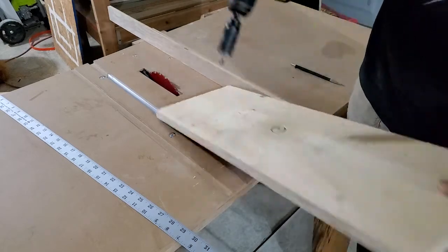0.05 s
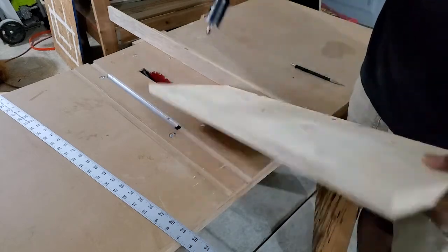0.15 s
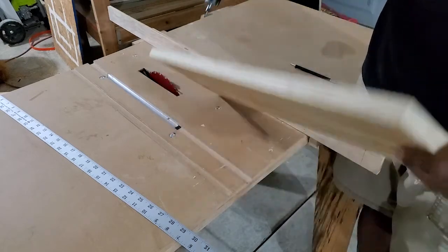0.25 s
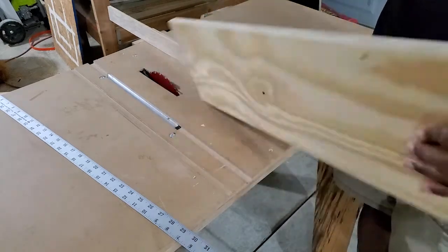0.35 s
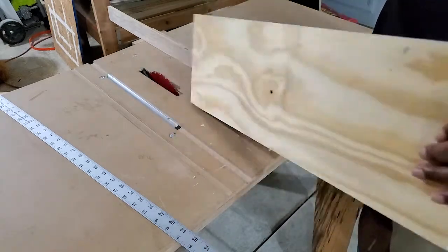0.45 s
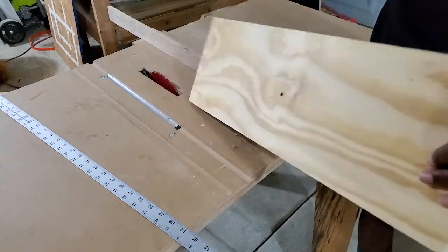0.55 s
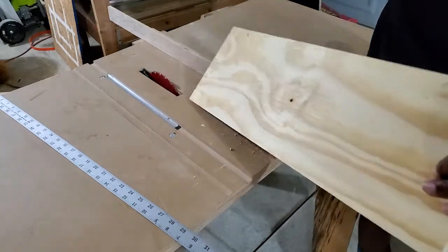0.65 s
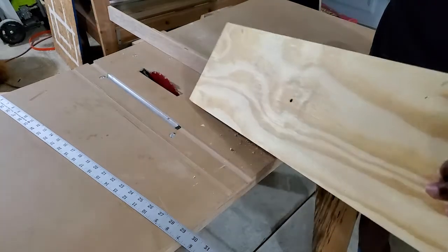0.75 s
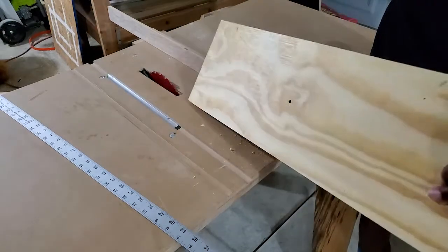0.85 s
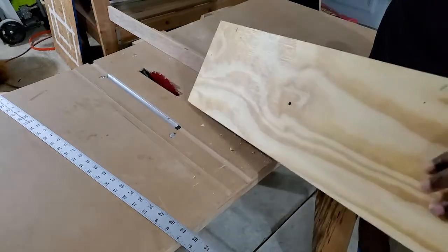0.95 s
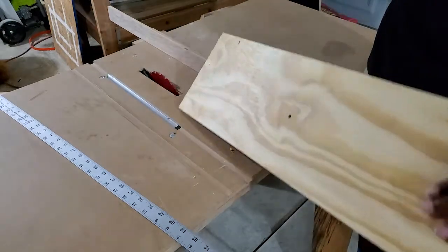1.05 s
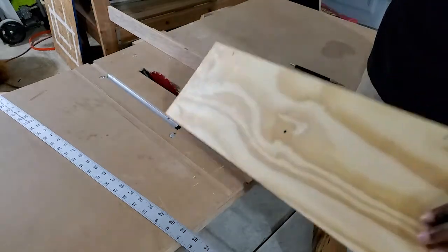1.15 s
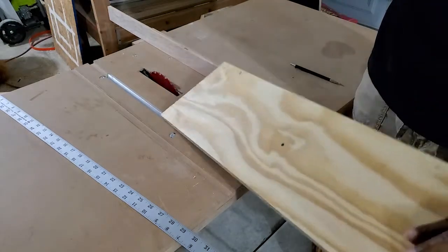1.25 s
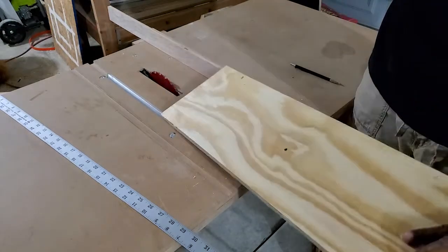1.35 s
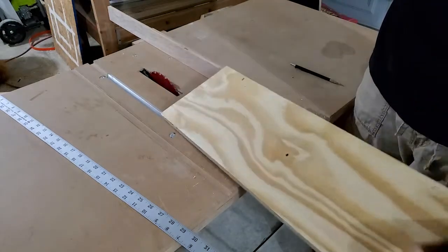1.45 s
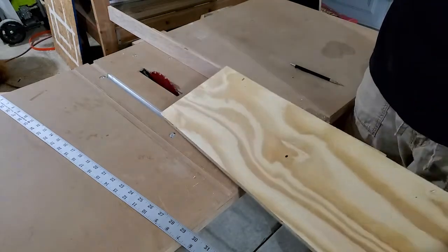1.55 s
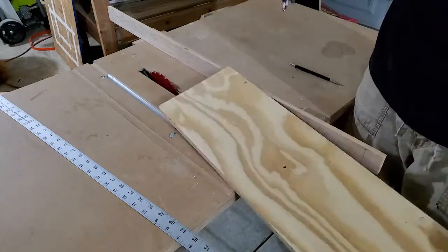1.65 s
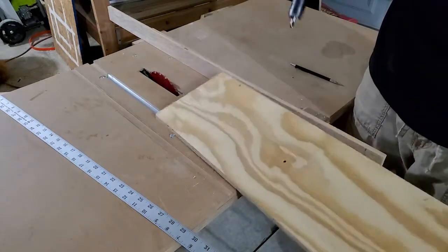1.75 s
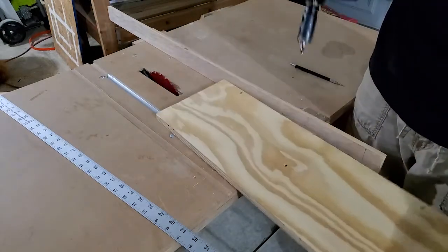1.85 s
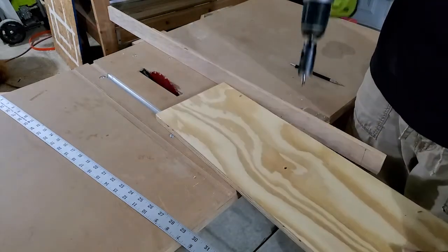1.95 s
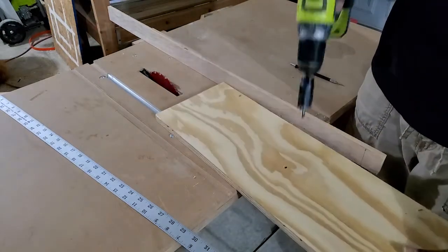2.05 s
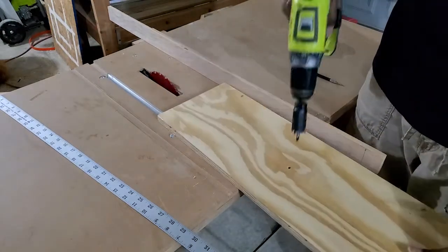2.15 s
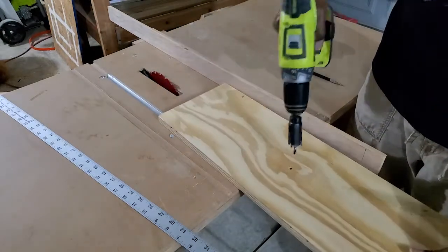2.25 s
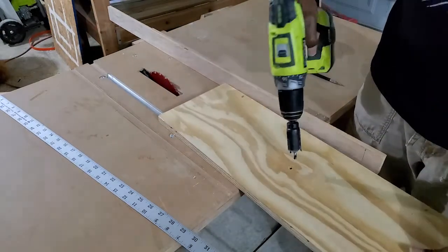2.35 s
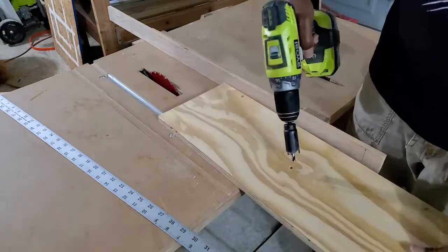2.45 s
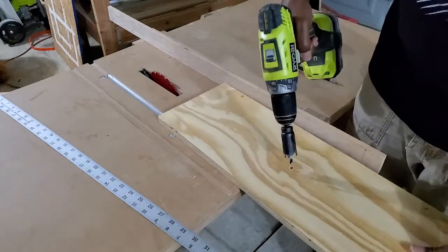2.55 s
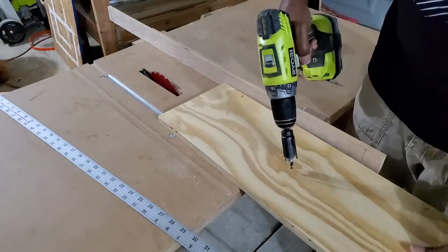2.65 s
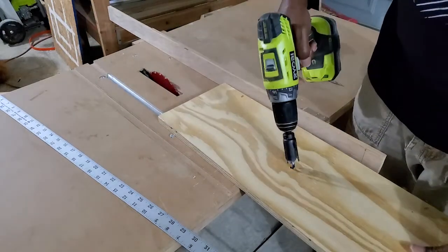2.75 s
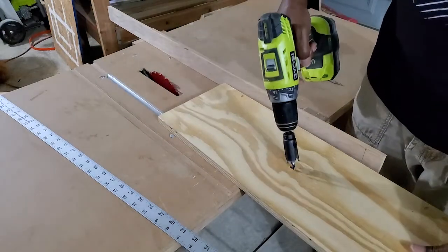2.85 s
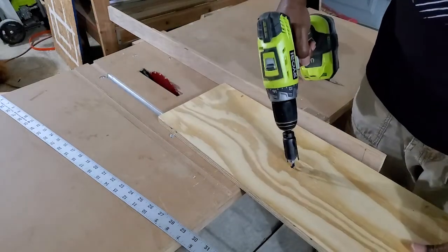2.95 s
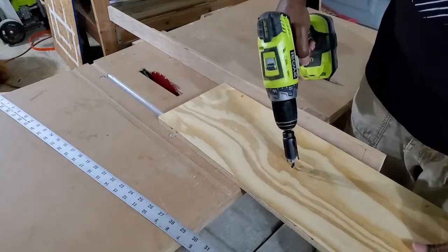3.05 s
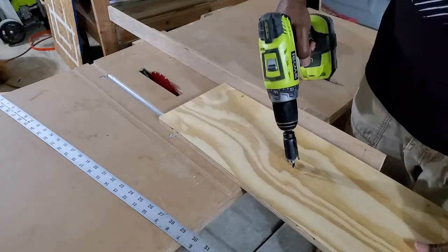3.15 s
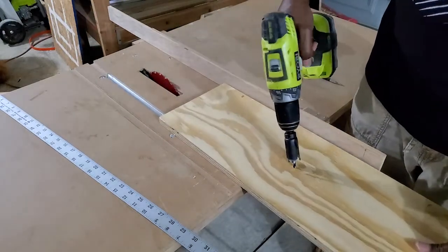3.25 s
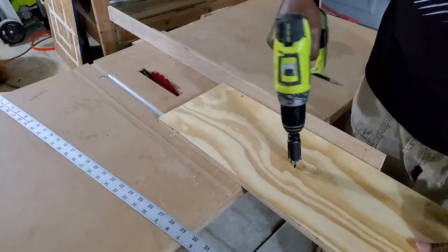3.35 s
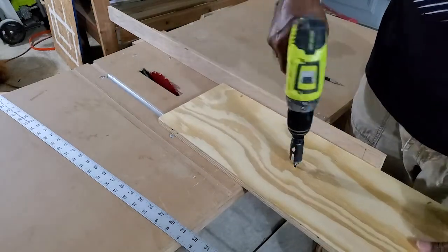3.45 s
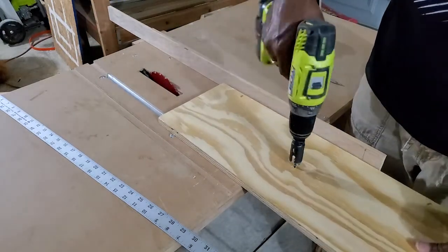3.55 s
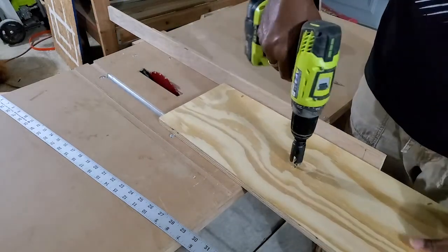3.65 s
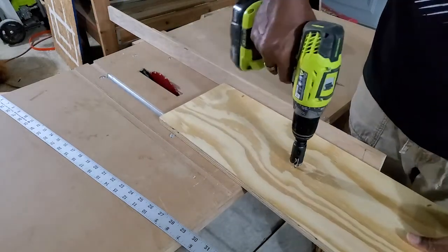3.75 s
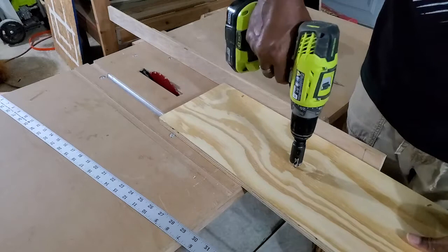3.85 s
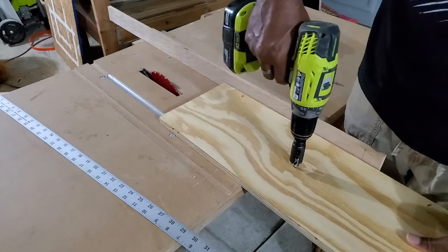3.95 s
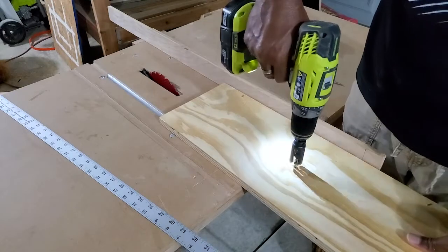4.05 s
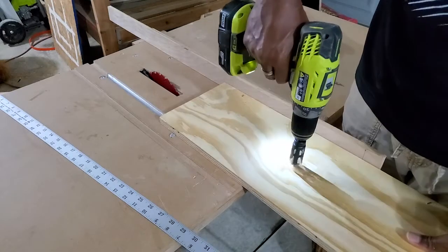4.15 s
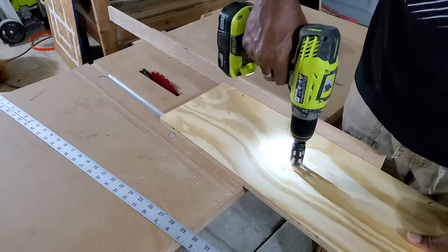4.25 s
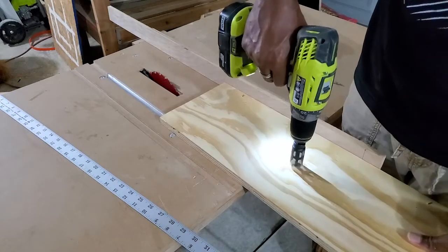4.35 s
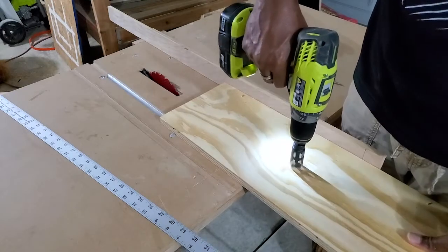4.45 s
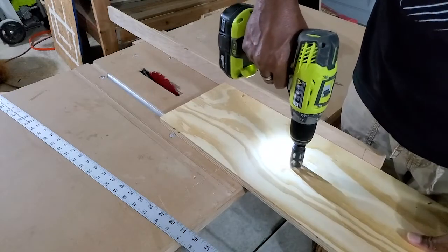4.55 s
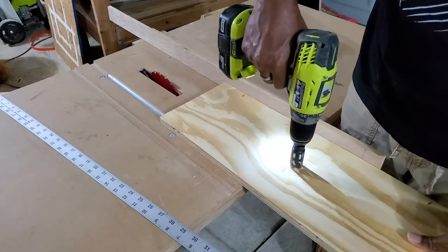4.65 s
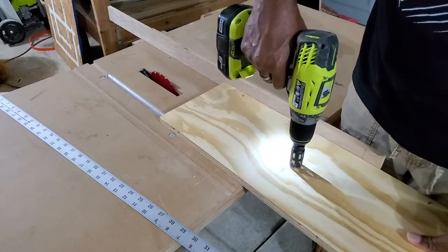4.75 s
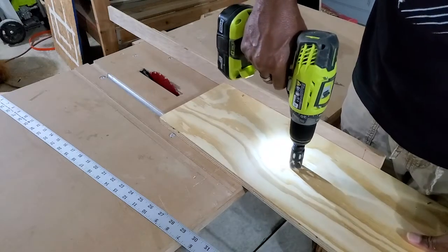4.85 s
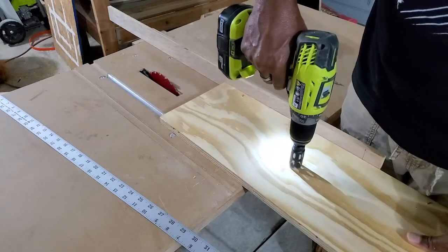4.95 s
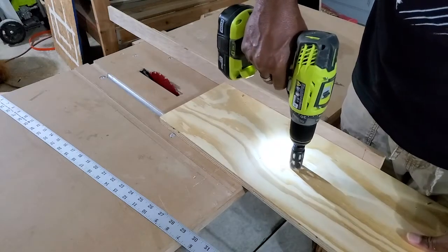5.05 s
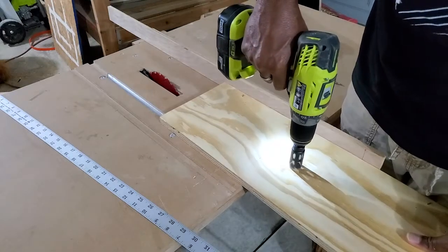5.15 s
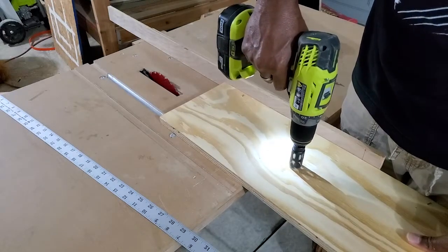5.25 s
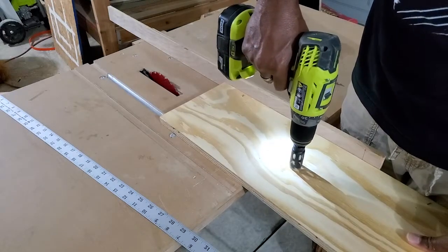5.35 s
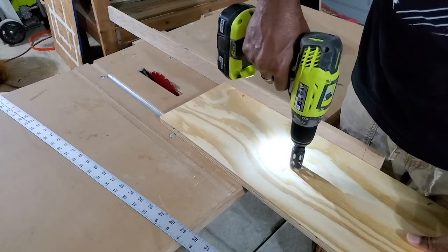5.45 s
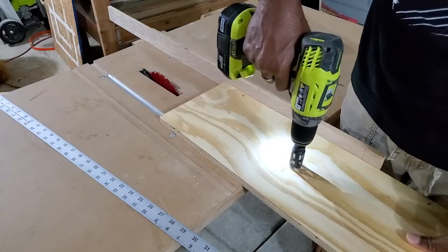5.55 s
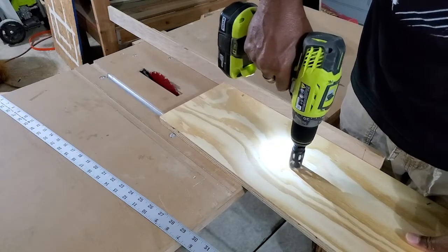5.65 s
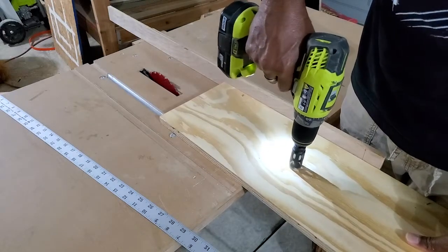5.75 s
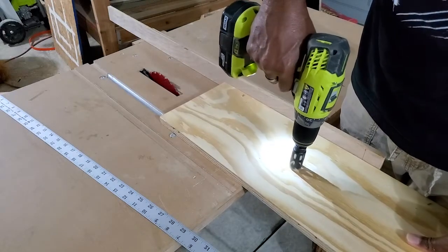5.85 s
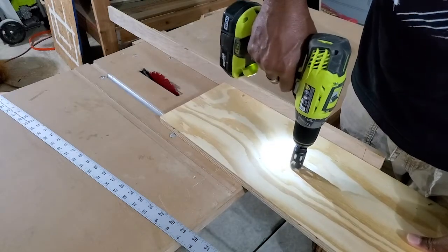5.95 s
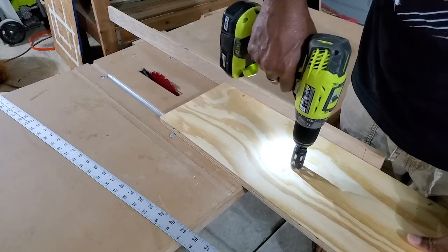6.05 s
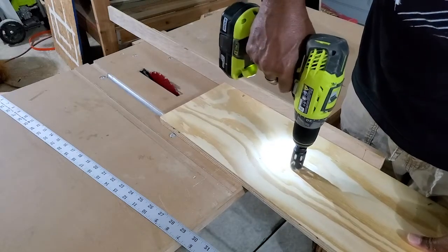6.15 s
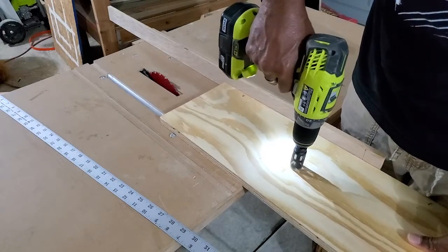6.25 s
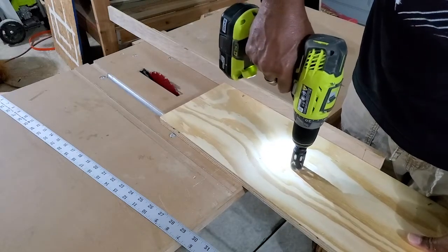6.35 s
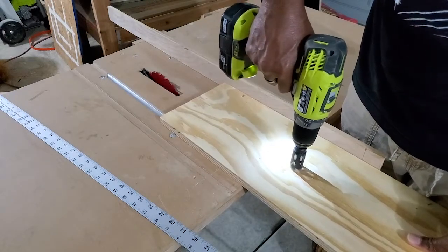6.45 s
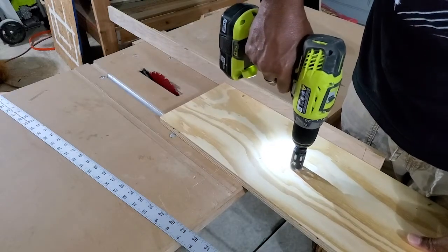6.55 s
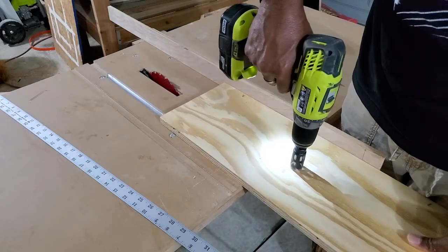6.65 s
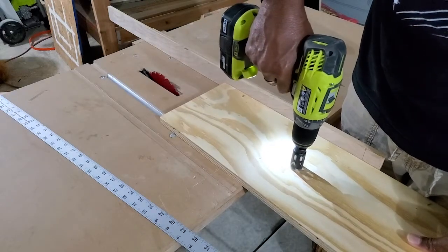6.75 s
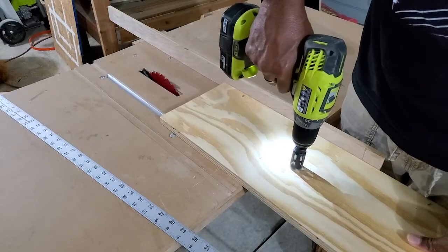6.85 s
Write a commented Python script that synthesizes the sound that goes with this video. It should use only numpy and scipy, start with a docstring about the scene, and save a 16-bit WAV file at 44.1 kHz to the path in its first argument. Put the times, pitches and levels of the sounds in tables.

```python
"""A board slides and knocks on a saw bench in a garage; then a drill whines and hisses as its hole saw rasps.
Slides are fine crackle through wood resonances; knocks are ringing board modes, bench thumps and bursts of impacts.
Hand rubs and clicks ring the drill's shell, and a soft bump sets the drill on the pine board.
Motor tones follow a speed curve. Noise surges make the rasp, tooth pulses shake board and bench,
and in short runs a tooth catches once a turn. Faint room air and hum lie under it all."""
import sys
import numpy as np
from scipy import signal
from scipy.fft import rfft, irfft, next_fast_len
from scipy.io import wavfile
from scipy.ndimage import map_coordinates

SR = 44100
rng = np.random.default_rng(int(sys.argv[2]) if len(sys.argv) > 2 else 0)


def transcribe(signal):
    """Save signal, clipped to [-1, 1], as a 16-bit WAV file at the path in sys.argv[1]."""
    frames = np.atleast_2d(signal).T
    limited = np.clip(frames, -1, 1)
    pcm = np.round(limited * 32767).astype(np.int16)
    wavfile.write(sys.argv[1], SR, pcm)


N = 304731

# Levels in the tables and settings are relative: the functions and scene() balance them further.
# Motor speed: the trigger is squeezed, eased, squeezed again, then the load drags on it.
# Each row: time in seconds, speed in turns per second.
MOTOR_SPEED = [(4.0, 35), (4.25, 258), (4.3, 313), (4.375, 334), (4.5, 283), (4.58, 256), (4.66, 243),
               (4.7, 298), (4.77, 326), (4.94, 342.5), (5.42, 326), (5.8, 327), (5.9, 333), (6.1, 334.5),
               (6.5, 330), (6.91, 320)]
# Bouts in which the saw rocks in its groove.
# Each row: start in seconds, length in seconds, level in dB, tilt of its upper multiples in dB per octave.
CHATTER = [(5.126, 0.082, -46, -12), (6.206, 0.2, -57, 5), (6.495, 0.13, -40.5, -2.5)]
# The rocking's tones. Each row: multiple of the saw's turn rate, level in dB.
LOBES = [(3, -2.5), (6, 4), (10, -5), (16, -2), (18, -3.5), (26, -8)]
# Motor tones. Each row: multiple of the motor's turn rate, level in dB.
WHINE = [(5, -15.5), (12, -7.5), (19, -24), (20, -11.5), (29, -9.5), (30, -13), (32, -25), (35, -26),
         (45, -20)]
# Squeals as the pilot bit enters.
# Each row: start in seconds, length in seconds, first pitch in Hz, last pitch in Hz, level in dB.
SQUEALS = [(4.091, 0.16, 1900, 2376, -46), (4.13, .115, 3900, 4440, -39.5)]
# Resonances of the board pressed on the bench. Each row: pitch in Hz, width in Hz, level in dB.
PRESSED_BOARD = [(371.5, 74, 0), (424, 31, -3.5), (584.7, 16, 2.5), (772, 49, -8), (1014.6, 7.4, 4),
                 (1260, 9, 1)]
# Resonances of the bench. Each row: pitch in Hz, width in Hz, level in dB.
BENCH = [(56, 38, 1), (106, 39, 1), (157, 55, 2), (203.3, 25, 1), (317.3, 100, 0.5)]
# Resonances of saw cup and chuck. Each row: pitch in Hz, width in Hz, level in dB.
CUP = [(1388, 63, -1), (1878, 152, 2.5), (2070, 76, 0.5), (2680, 450, -3), (4076, 230, 1.5),
       (5640, 91, -13)]
# Colour of flying chips, and of skin rubbing. Each row: frequency in Hz, level in dB per Hz.
CHIPS = [(200, 0.5), (600, -33), (950, 1.5), (1600, 2.5), (2300, 5.5), (3500, 1.5), (7000, -20),
         (8500, -7.5), (12000, -7)]
# Colour of the fan hiss, which also shades the whine. Each row: frequency in Hz, level in dB per Hz.
FAN = [(200, -0.5), (900, -5.5), (1800, 8.5), (3400, 2.5), (6500, 4), (7400, 3.5), (8300, -3.5), (9300, 2),
       (11500, 5), (14200, 2.5), (16000, 2.5)]
# Colour of the sliding crackle. Each row: frequency in Hz, level in dB per Hz.
SLIDE_COLOUR = [(500, -21.5), (1000, -9.5), (1260, -3.5), (2900, -10.5), (8500, -26.5), (12000, -25),
                (16000, -32.5)]
# Colour of the room's still air. Each row: frequency in Hz, level in dB per Hz.
AIR = [(25, -34.5), (55, -4.5), (90, -17), (125, -11.5), (185, -8), (260, -14.5), (600, -22), (3500, -53),
       (16000, -59)]
# Machine hum. Each row: pitch in Hz, level in dB.
HUM = [(120, -72), (178, -70)]
# Strokes that push the board over the bench.
# Each row: start in seconds, length in seconds, board level in dB, scrape level in dB,
# brightness in dB per octave.
SLIDES = [(0.0, 0.2, -61.5, -66, -3), (0.192, 0.071, -48, -58.5, -1), (0.273, 0.03, -49, -55.5, -7.5),
          (0.294, 0.026, -61, -41, 0), (0.376, 0.012, -69, -45, 3), (0.82, 0.036, -65, -64.5, 2.5),
          (0.954, 0.12, -66, -54, 7.5), (0.988, 0.041, -53, -51.5, -16), (1.095, 0.12, -56, -54, 3.5),
          (1.238, 0.17, -48, -66.5, -5.5), (1.602, 0.28, -42.5, -52, -4)]
# The board meets bench and fence.
# Each row: time in seconds, board level in dB, centre of its ring in Hz, crack level in dB, contact in ms.
KNOCKS = [(0.384, -45, 1300, -31.5, 2), (1.1674, -19.5, 522, -19.5, 15), (1.1743, -26, 524, -35, 2),
          (1.2205, -30.5, 450, -45, 2), (1.324, -39, 504, -37.5, 0.48), (1.364, -36.5, 750, -48, 2),
          (1.586, -19, 767, -32.5, 22), (1.677, -32.5, 762, -34.5, 2), (1.687, -34, 1103, -40, 2),
          (1.7088, -21, 922, -32.5, 2.8), (1.7444, -34, 1200, -44, 1.7), (1.7685, -33.5, 925, -41, 1.5),
          (1.789, -26.5, 741, -9.5, 0.011), (1.82, -35, 619, -30.5, 1.2), (1.851, -29.5, 688, -30.5, 3)]
# Resonances of the loose board. Each row: pitch in Hz, width in Hz, level in dB.
FREE_BOARD = [(268, 41, -2), (337, 30, -5), (430.4, 36, 8), (584, 23, 6), (698, 17, 4), (798, 52, 8.5),
              (958, 28, 1), (1210, 110, 12), (1470, 40, -4), (2150, 750, -18)]
# Echo decay in the garage. Each row: frequency in Hz, seconds to fade by 60 dB.
GARAGE = [(80, 1), (400, 0.57), (4000, 0.6), (8000, 0.52), (15000, 0.086)]
# Stereo spread of echoes and diffuse noise. Each row: frequency in Hz, left-right likeness from 0 to 1.
ALIKE = [(120, 0.99), (300, 0.93), (600, 0.49), (1100, 0.089), (1800, 0.02)]
# Resonances of the loose board's hard edge. Each row: pitch in Hz, width in Hz, level in dB.
EDGE = [(1460, 330, 5), (1950, 560, 3), (2710, 470, -2)]
# Colour of the first instant of contact. Each row: frequency in Hz, level in dB per Hz.
SNAP = [(800, -27.5), (2300, 0.5), (4000, 0.5), (5500, -9.5), (7800, -12), (12000, -11.5), (14500, -40)]
# How hard the hand feeds the saw into the wood. Each row: time in seconds, feed in dB over a firm bite.
FEED = [(4.0, -25), (4.18, -19), (4.4, -15), (4.56, -12.5), (5.02, -6), (5.15, 0), (5.48, 1.5),
        (5.92, -3.5), (6.28, 5.5)]
# The hand shifts on the drill's grip. Each row: start in seconds, length in seconds, level in dB.
RUBS = [(2.252, 0.032, -76), (3.058, 0.12, -78.5), (3.293, .33, -72.5), (3.964, 0.049, -72)]
# Chuck and trigger clicks. Each row: time in seconds, shell level in dB, bright snap level in dB.
CLICKS = [(3.1002, -68, -42), (3.2075, -72, -49), (3.454, -57, -50), (3.5186, -69, -44), (3.645, -63, -53),
          (3.7518, -64, -50), (3.9652, -72, -41), (4.0133, -41, -33)]
# Resonances of the drill's plastic shell. Each row: pitch in Hz, width in Hz, level in dB.
HOUSING = [(1190, 310, 2), (1853, 140, 1), (2360, 200, -1), (3600, 500, -10), (5700, 500, -10)]
# Runs in which one tooth catches in hard grain once every turn.
# Each row: first catch in seconds, length in seconds, peak in dB, gain per turn in dB.
CATCHES = [(5.088, .19, -30, 0), (5.324, .105, -32.5, 1), (5.436, .105, -34.5, -1), (5.638, .02, -24.5, -3),
           (5.682, .15, -31, -0.5), (5.984, .15, -32.5, -0.5), (6.248, .105, -39, 1),
           (6.798, .105, -27, -3)]
# Swell of the bench's rumble. Each row: time in seconds, level in dB.
SHUDDER = [(4.0, -52), (4.11, -47.5), (4.16, -44), (4.28, -54), (4.55, -53.5), (4.8, -46.5), (5.55, -46),
           (5.68, -46), (5.92, -52), (6.12, -40.5), (6.5, -38.5)]
# Resonances of the scraped board. Each row: pitch in Hz, width in Hz, level in dB.
SCRAPE = [(1260, 35, -6), (1380, 55, -2.5), (1868, 53, -8.5), (2325, 58, 0), (2917, 33, -7.5)]
# Cup modes that the rubbing rim sets squeaking. Each row: pitch in Hz, level in dB.
SINGING = [(1870, -18.5), (4130, -19), (4440, -17)]

STROKE_ATTACK_S, STROKE_RELEASE_S = 0.045, 0.028  # sliding strokes: time to change by 20 dB
REBOUND_S, REBOUND_DB = 0.007965, -11.5  # the board slaps down a second time
THUMP_DB, THUMP_DB_PER_OCTAVE = 8, -6  # bench under a blow centred at 500 Hz; higher blows shake it less
PUSH_DB, PUSH_CYCLES = -5, 0.7  # first push, relative to the ring; cycles to the peak of its envelope
RUB_ATTACK_S, RUB_RELEASE_S = 0.023, 0.035  # time to change by 20 dB
BUMP_S, BUMP_HZ, BUMP_DB, BUMP_RISE_S = 2.703, 205, -48, 0.013  # rise is time to the fullest swing
PING_HZ, PING_DB, PING_T60_S = 1865, -78.5, 0.61  # the saw cup as it is set down
START_S, SWITCH_ON_S = 4.0, 0.014  # the motor is switched on and takes hold
GEARING = 14.35  # motor turns per saw turn
CRUISE = 330  # the motor's usual speed (turns per s)
HISS_DB, HISS_POWER = -34.5, 1.37  # level at cruising speed; it grows with this power of the speed
WHINE_DB = -42
# what the bite drives: (dB at a firm bite, dB gained per dB of bite)
JUDDER, RASP, TEAR = (-42.5, 0.69), (-37, 0.59), (-40, 0.7)
CATCH_HZ, CATCH_RISE_S = 430, 0.0056  # the note of the jolted board; time to its fullest swing
CHATTER_BUILD_S, CHATTER_FADE_S = 0.4, 0.13  # time to change by 20 dB
TOP_HZ = 15820  # the microphone's band limit


def amp(db):
    """Decibels to gain."""
    return 10 ** (np.asarray(db) / 20)


def unit(x):
    """x at rms 1."""
    return x / np.sqrt(np.mean(x ** 2) + 1e-20)


def along(points, hz):
    """Read (Hz, value) points on a log frequency axis."""
    f, v = np.transpose(points)
    return np.interp(np.log(hz + 1), np.log(f + 1), v)


def curves(rows):
    """One value per sample for each column after the time."""
    s, *cols = np.transpose(rows)
    return [np.interp(np.arange(N) / SR, s, c) for c in cols]


def wobble(rate):
    """A smooth random curve, rate knots a second."""
    knots = rng.standard_normal(int(N * rate / SR) + 4)
    return map_coordinates(knots, [np.arange(N) * rate / SR])


def envelope(start, length, attack, release):
    """Attack, hold, release; attack and release are the seconds it takes to change by 20 dB."""
    t = np.arange(N) / SR
    before, after = np.maximum(start - t, 0), np.maximum(t - start - length, 0)
    return amp(-20 * (before / attack + after / release))


def filtered(x, response):
    """x times a complex response of frequency."""
    m = next_fast_len(N + SR // 2)
    return irfft(rfft(x, m) * response(np.fft.rfftfreq(m, 1 / SR)), m)[..., :N]


def coloured(x, spectrum):
    """x through a smooth spectrum, at rms 1."""
    return unit(filtered(x, lambda hz: amp(along(spectrum, hz))))


def rung(x, modes, sign=1):
    """x through a body's resonances; a negative sign makes neighbouring modes move in opposite senses."""
    def response(f):
        return sum(sign ** k * amp(db) * 1j * f * width / (hz * hz - f * f + 1j * f * width)
                   for k, (hz, width, db) in enumerate(modes))
    return filtered(x, response)


def strikes(times, db):
    """One impulse at each time."""
    return np.bincount(np.round(np.asarray(times) * SR).astype(int), amp(db), N)


def struck(blows, body):
    """Impulses ring a body; a blow of 1 peaks at 1."""
    return rung(blows, body, -1) / np.abs(rung(signal.unit_impulse(N), body, -1)).max()


def grains(rate, spread_db):
    """Tiny fibre snaps of uneven size, rate a second, at rms 1."""
    snap_now = rng.random(N) < rate / SR
    return unit(snap_now * rng.standard_normal(N) * amp(spread_db * rng.standard_normal(N)))


def tone(hz):
    """A sine of rms 1 that follows a pitch curve."""
    return np.sqrt(2) * np.sin(2 * np.pi * (np.cumsum(hz) / SR + rng.random()))


def spread(hz):
    """The mid-side angle that gives left and right their likeness at each frequency."""
    return np.arccos(np.clip(along(ALIKE, hz), -1, 1)) / 2


def direct(x, lag):
    """Sound that reaches the left microphone lag samples late."""
    return filtered(x, lambda f: np.exp(np.outer([-1, 1], 1j * np.pi * f * lag / SR)))


def diffuse(spectrum):
    """Stereo noise of rms 1 arriving from all sides."""
    def response(hz):
        return amp(along(spectrum, hz)) * np.array([np.cos(spread(hz)), np.sin(spread(hz))])
    mid, side = filtered(rng.standard_normal((2, N)), response)
    return unit(np.array([mid + side, mid - side]))


def echoes():
    """A fresh stereo noise tail of left-channel energy 1, each band dying at its own rate."""
    hz, t = np.fft.rfftfreq(256, 1 / SR), np.arange(220) * 128 / SR
    turn = spread(hz)[:, None]
    z = rng.standard_normal((2, len(hz), 2 * len(t))).view(complex)
    z = z * amp(-60 * t / along(GARAGE, hz)[:, None]) * np.array([np.cos(turn), np.sin(turn)])
    mid, side = signal.istft(z, SR)[1]
    tail = np.pad([mid + side, mid - side], ((0, 0), (SR // 300, 0)))  # echoes start 1/300 s late
    return tail / np.linalg.norm(tail[0])


def garage(x, wet_db, lag, size=8192):
    """Direct sound plus echoes that carry little bass and crossfade to a fresh tail every half block."""
    echo = np.zeros((2, N + 2 * SR))
    padded = np.pad(x, (size // 2, size))
    fade = np.sin(np.pi * np.arange(size) / size)
    for at in range(0, N + size // 2, size // 2):
        answer = signal.fftconvolve((padded[at:at + size] * fade)[None], echoes(), axes=1)
        echo[:, at:at + answer.shape[1]] += answer
    echo = echo[:, size // 2:][:, :N]
    return direct(x, lag) + amp(wet_db) * filtered(echo, lambda hz: hz / np.hypot(hz, 130))


def room_tone():
    """Still air as diffuse noise, with a faint machine hum wavering in pitch and level."""
    hum = sum(amp(db + 2 * wobble(3)) * tone(hz * (1 + 0.025 * wobble(12))) for hz, db in HUM)
    return amp(-64) * diffuse(AIR) + hum


def slides(drone_hz=430):
    """Rubbing surfaces crackle finely, make the board drone and the bench rumble."""
    out = np.zeros(N)
    rubbing = grains(6000, spread_db=0)
    drone = unit(rung(rubbing, FREE_BOARD) + amp(-1.5) * rung(rubbing, BENCH))
    # a resonant low-pass keeps the drone low
    drone = unit(filtered(drone, lambda hz: 1 / (1 - (hz / drone_hz) ** 2 + 0.5j * hz / drone_hz)))
    catching = amp(2.2 * wobble(80))
    slips = grains(6000, spread_db=4) * catching
    crackle = coloured(slips, SLIDE_COLOUR) + amp(-4) * unit(rung(slips, SCRAPE, -0.91))
    for s, length, board_db, scrape_db, tilt_db in SLIDES:
        scrape = unit(filtered(crackle, lambda hz: amp(tilt_db * np.log2(1 + hz / 1000))))
        stroke = envelope(s, length, STROKE_ATTACK_S, STROKE_RELEASE_S)
        out += stroke * (amp(board_db) * drone + amp(scrape_db) * scrape)
    return out


def cracks():
    """Each contact is a short, decaying burst of tiny impacts of random sign."""
    out, ms = np.zeros(N), np.arange(SR // 20) * 1000 / SR
    for s, _, _, crack_db, contact_ms in KNOCKS:
        burst = rng.choice([-1, 1], len(ms)) * np.exp(-ms / contact_ms)
        out[round(s * SR):][:len(ms)] += amp(crack_db) * burst / np.linalg.norm(burst)
    return out


def knocks(octaves=0.91, thump_hz=450):
    """Blows ring the board modes near their centre, thump the bench, rebound and clack the edge."""
    wood, t = np.zeros(N), np.arange(SR // 4) / SR
    hz, width, db = np.transpose(FREE_BOARD)[..., None]
    sign = (-1) ** np.arange(len(hz))[:, None]
    modes = sign * amp(db) * np.exp(-np.pi * width * t) * np.sin(2 * np.pi * hz * t)
    for s, board_db, centre_hz, _, _ in KNOCKS:
        favoured = np.exp(-(np.log2(hz / centre_hz) / octaves) ** 2 / 2)
        ring = np.sum(modes * favoured * amp(rng.standard_normal(hz.shape)), axis=0)
        wood[round(s * SR):][:len(t)] += amp(board_db) * ring / np.abs(ring).max()
    times, blow_db, centres_hz, _, _ = np.transpose(KNOCKS)
    bench_db = blow_db + THUMP_DB + THUMP_DB_PER_OCTAVE * np.log2(centres_hz / 500)
    thump = struck(strikes(times, bench_db), BENCH)
    thump = filtered(thump, lambda f: 1 / (1 + 1j * f / thump_hz) ** 2)  # the heavy bench yields slowly
    slaps = filtered(wood + thump, lambda f: 1 + amp(REBOUND_DB) * np.exp(-2j * np.pi * f * REBOUND_S))
    return slaps + amp(-2.5) * struck(cracks(), EDGE)


def snaps(snap_db=9):
    """The bright first instant of each knock beams straight at the microphone."""
    return filtered(amp(snap_db) * cracks(), lambda hz: amp(along(SNAP, hz)))


def pushes():
    """Each blow first shoves the air with the board's face, in one or two stiff swings."""
    out, t = np.zeros(N), np.arange(SR // 20) / SR
    for s, board_db, centre_hz, _, _ in KNOCKS:
        cycles = centre_hz * t
        u = cycles / PUSH_CYCLES
        shove = np.sin(2 * np.pi * cycles) * u * np.exp(1 - u)
        out[round(s * SR):][:len(t)] -= amp(board_db + PUSH_DB) * shove
    return out


def grip(skin_db=-6, click_db=6):
    """Skin rubs on the drill's shell; chuck and trigger click and ring it."""
    friction = grains(1200, spread_db=3)
    rub = unit(rung(friction, HOUSING)) + amp(skin_db) * coloured(friction, CHIPS)
    pressure = sum(amp(db) * envelope(s, length, RUB_ATTACK_S, RUB_RELEASE_S) for s, length, db in RUBS)
    times, shell_db, bright_db = np.transpose(CLICKS)
    snap = filtered(strikes(times, bright_db), lambda hz: amp(along(SNAP, hz)))
    return pressure * rub + amp(click_db) * struck(strikes(times, shell_db), HOUSING) + snap


def set_down():
    """The drill is lowered onto the board: a soft, low bump, and the steel cup rings briefly."""
    age = np.maximum(np.arange(N) / SR - BUMP_S, 0)
    u = age / BUMP_RISE_S
    bump = amp(BUMP_DB) * (u * np.exp(1 - u)) ** 2 * np.sin(2 * np.pi * BUMP_HZ * age)
    ping = amp(PING_DB - 60 * age / PING_T60_S) * tone(PING_HZ * (1 + 0.016 * wobble(300)))
    return bump + np.minimum(u, 1) * ping


def running():
    """Rises from 0 to 1 as the motor is switched on."""
    return np.clip((np.arange(N) / SR - START_S) / SWITCH_ON_S, 0, 1)


def saw_turns():
    """Turns the saw has made: the motor's speed, geared down and summed."""
    return np.cumsum(curves(MOTOR_SPEED)[0] / GEARING) / SR


def driven(law):
    """Gain of a sound that grows with the feed."""
    firm_db, db_per_db = law
    return amp(firm_db + db_per_db * curves(FEED)[0])


def hiss(lag, wet_db):
    """Fan and brushes hiss, louder with speed, fluttering a little, and fill the room."""
    flutter = amp(2 * wobble(60))
    near = direct(coloured(rng.standard_normal(N), FAN), lag) * flutter
    noise = unit(near + amp(wet_db) * diffuse(FAN))
    return running() * amp(HISS_DB) * (curves(MOTOR_SPEED)[0] / CRUISE) ** HISS_POWER * noise


def whine():
    """Commutator and gears sing on multiples of the motor's speed; high ones fade most at low speed."""
    speed = curves(MOTOR_SPEED)[0]
    sway = 0.0016 * np.sin(2 * np.pi * saw_turns())  # the speed sags once in every turn of the saw
    speed = speed * (1 + sway + 0.001 * wobble(60))
    lines = np.zeros(N)
    for order, db in WHINE:
        hz = order * speed
        strength = (speed / speed.max()) ** (order / 3)
        lines += strength * amp(db + along(FAN, hz) + 2 * wobble(20)) * tone(hz)
    return running() * amp(WHINE_DB) * lines


def rasp():
    """Fibres tear in a surge once in every turn of the saw; the cup rings and, once pressed, squeaks."""
    turns = saw_turns()
    first_catch = round(CATCHES[0][0] * SR)
    surge_db = -4 * np.cos(2 * np.pi * (turns - turns[first_catch]))  # weakest at the very first catch
    tearing = grains(6000, spread_db=1) * amp(0.6 * surge_db + 2.2 * wobble(160) + 1.3 * wobble(50))
    squeaks = np.zeros(N)
    for hz, db in SINGING:
        note = tone(hz * (1 + 0.016 * wobble(70)))
        squeaks += amp(db) * unit(amp(surge_db + 3 * wobble(70)) * note)
    pressed = np.minimum(2 * amp(curves(FEED)[0]), 1) ** 2
    cup = amp(-1) * unit(rung(tearing, CUP)) + 2 * pressed * squeaks
    chips = coloured(tearing * np.sign(rng.standard_normal(N)), CHIPS)
    return running() * (driven(RASP) * cup + driven(TEAR) * chips)


def teeth(turns, scatter_db, count=14):
    """One push as each tooth meets the hard grain; some teeth bite deeper than others."""
    at = np.flatnonzero(np.diff(np.floor(turns * count + 0.14 * wobble(90))))
    tooth = np.round(turns[at] * count).astype(int) % count
    depth_db = 3 * rng.standard_normal(count)
    size = amp(depth_db[tooth] + scatter_db * rng.standard_normal(N)[at])
    return unit(np.bincount(at, size - np.median(size), N))


def hole_saw(soft_hz=1500):
    """Teeth shake board and bench; the harder the feed, the more the board judders."""
    cutting = running()

    def level(x):
        """x at rms 1 while the motor runs."""
        return x / np.sqrt(np.average(x ** 2, weights=cutting))

    bites = level(teeth(saw_turns(), scatter_db=1)) + 0.45 * grains(900, spread_db=3.5)
    bites = filtered(bites, lambda hz: 1 / (1 + 1j * hz / soft_hz))
    rumble = amp(curves(SHUDDER)[0]) * level(rung(bites, BENCH))
    judder = driven(JUDDER) * level(rung(bites, PRESSED_BOARD))
    return cutting * (rumble + judder)


def squeals():
    """The pilot bit sticks and slips in the fresh hole: each squeal swells, glides and settles."""
    out = np.zeros(N)
    for s, length, first_hz, last_hz, db in SQUEALS:
        u = np.clip((np.arange(N) / SR - s) / length, 0, 1)
        hz = last_hz + (first_hz - last_hz) * (1 - u) ** 2
        out += np.sin(np.pi * u) * amp(db + 3.5 * wobble(80)) * tone(hz * (1 + 0.007 * wobble(200)))
    return out


def catches():
    """Once a turn the catching tooth jolts the board, which answers with a short, low knock."""
    out, t = np.zeros(N), np.arange(SR // 16) / SR
    turn_s = GEARING / curves(MOTOR_SPEED)[0]
    u = t / CATCH_RISE_S
    swing = (u * np.exp(1 - u)) ** 2
    for s, length, db, db_per_turn in CATCHES:
        period = turn_s[round(s * SR)]
        for k, at in enumerate(np.arange(s, s + length, period)):
            note = np.sin(2 * np.pi * CATCH_HZ * (1 + 0.03 * rng.standard_normal()) * t)
            knock = amp(db + db_per_turn * k + rng.standard_normal()) * swing * note
            room = out[round(at * SR):][:len(t)]
            room += knock[:len(room)]
    return out


def chatter():
    """The saw rocks in its groove a whole number of times a turn and the bench drones."""
    spin = curves(MOTOR_SPEED)[0] / GEARING
    bouts = [(amp(db) * envelope(s, length, CHATTER_BUILD_S, CHATTER_FADE_S), tilt_db)
             for s, length, db, tilt_db in CHATTER]
    out = np.zeros(N)
    for order, db in LOBES:
        octaves = max(np.log2(order / 3), 0)
        swell = sum(bout * amp(tilt_db * octaves) for bout, tilt_db in bouts)
        out += swell * amp(db + 2 * wobble(12)) * tone(order * spin * (1 + 0.006 * wobble(30)))
    return running() * out


def scene(drill_lag=7.33):
    """Handling and drilling in the same room; larger echo blocks serve the drill's pure tones."""
    handled = knocks() + amp(-1) * slides() + amp(-5.5) * grip() + set_down()
    handling = garage(handled, wet_db=-3.5, lag=2.2) + snaps() + pushes()
    cutting = amp(-3.5) * garage(hole_saw(), wet_db=-1, lag=drill_lag) + chatter()
    grinding = garage(catches() + amp(-1) * rasp(), wet_db=-5, lag=drill_lag)
    tones = garage(whine() + squeals(), wet_db=-5, lag=drill_lag, size=16384)
    drilling = cutting + grinding + tones + hiss(drill_lag, wet_db=5.5)
    return handling + drilling * amp([[-0.25], [0.25]]) + room_tone()  # the drill leans slightly right


def record(dry):
    """The microphone loses the deepest bass and everything above its band limit."""
    return filtered(dry, lambda hz: hz ** 8 / (hz ** 8 + 35 ** 8) / (1 + (hz / TOP_HZ) ** 400))


dry = scene()
out = record(dry)
transcribe(out)
```